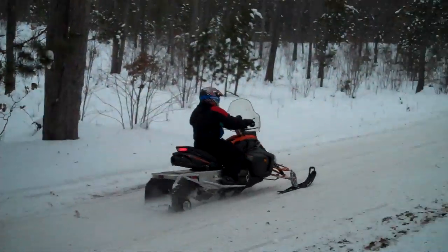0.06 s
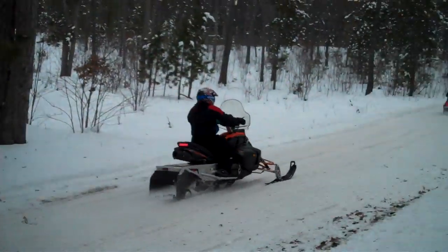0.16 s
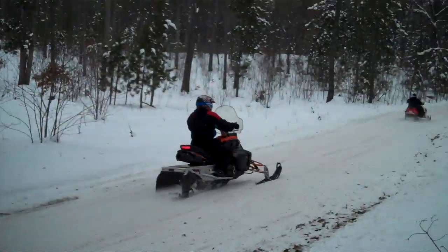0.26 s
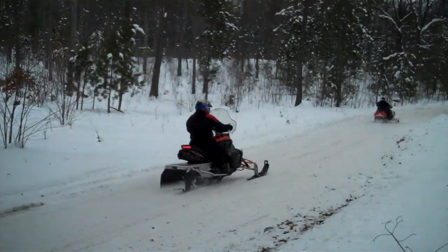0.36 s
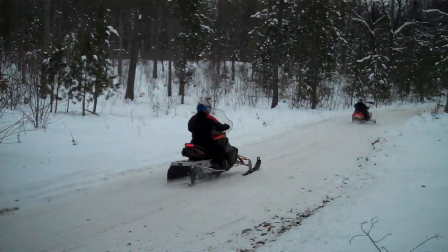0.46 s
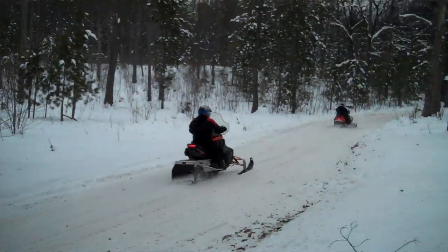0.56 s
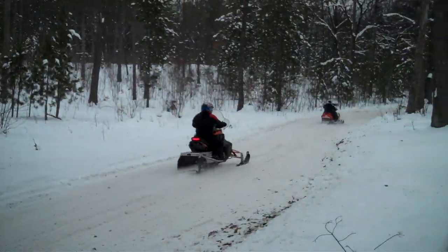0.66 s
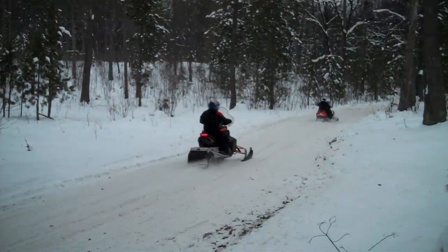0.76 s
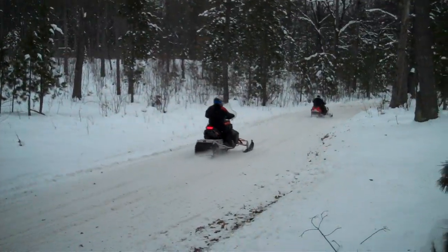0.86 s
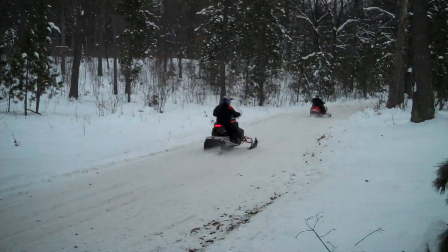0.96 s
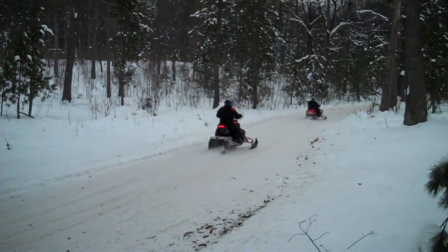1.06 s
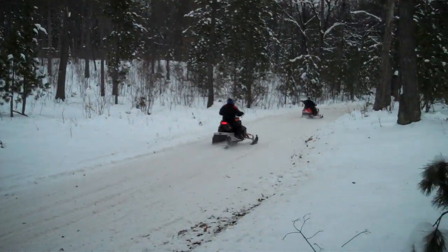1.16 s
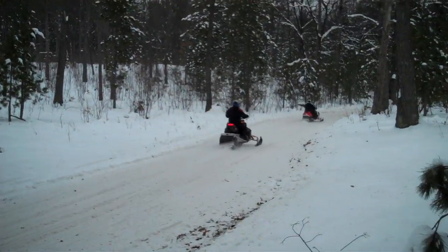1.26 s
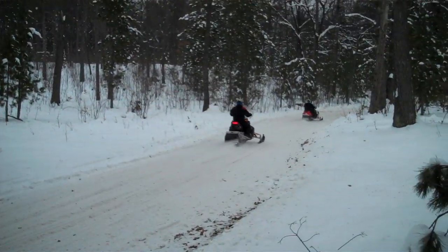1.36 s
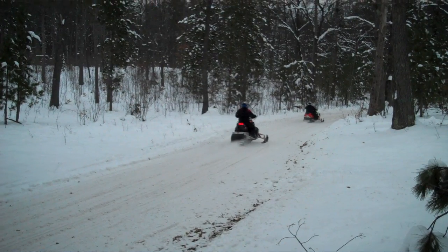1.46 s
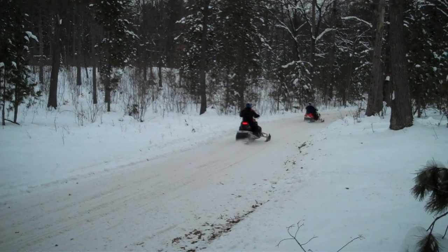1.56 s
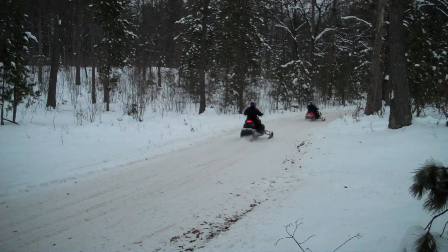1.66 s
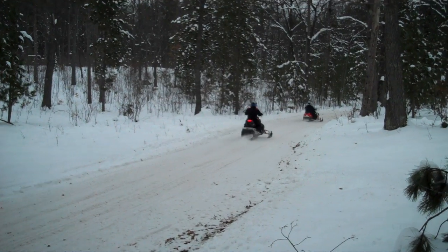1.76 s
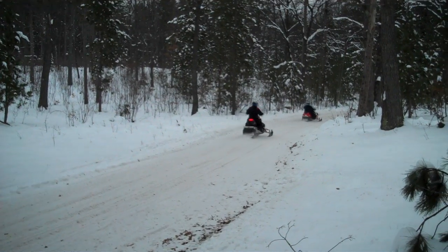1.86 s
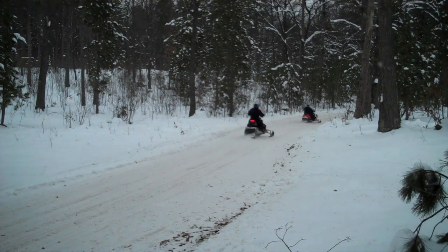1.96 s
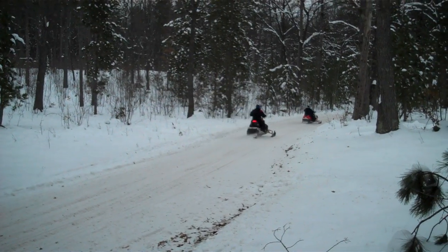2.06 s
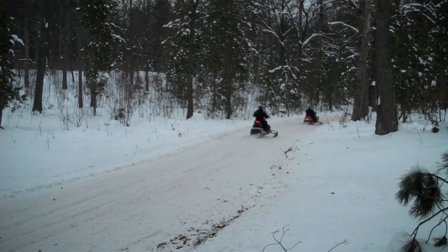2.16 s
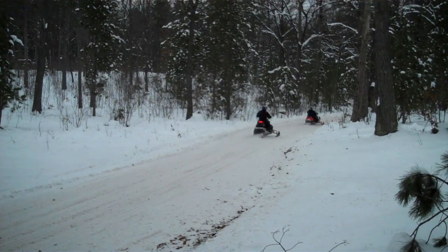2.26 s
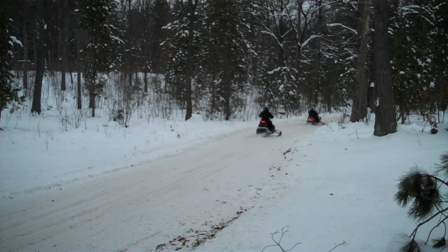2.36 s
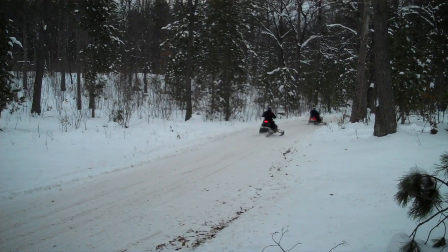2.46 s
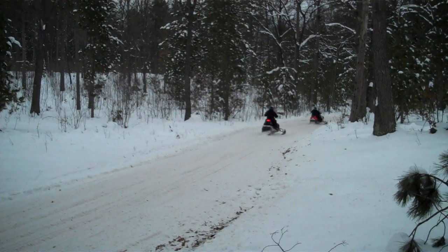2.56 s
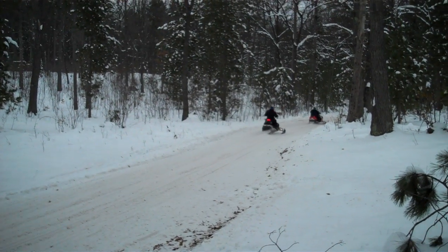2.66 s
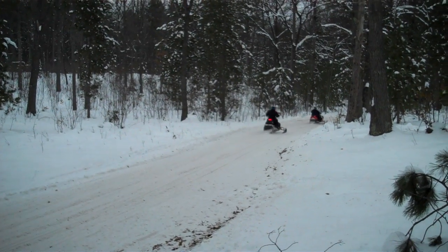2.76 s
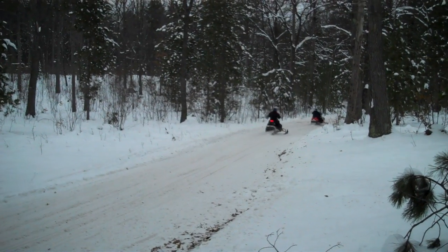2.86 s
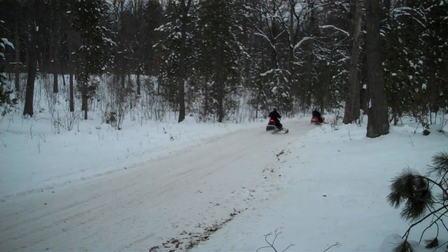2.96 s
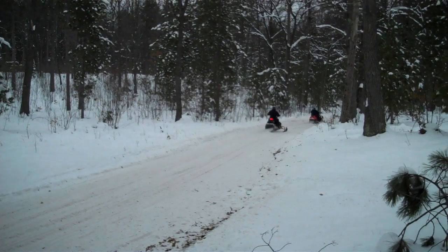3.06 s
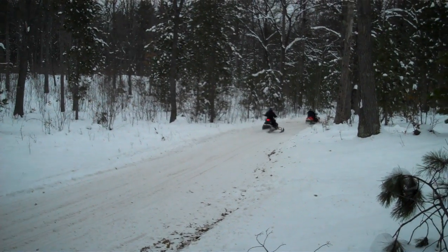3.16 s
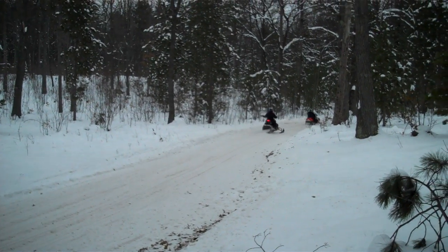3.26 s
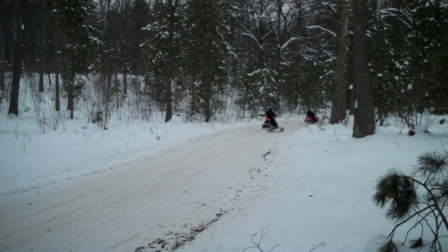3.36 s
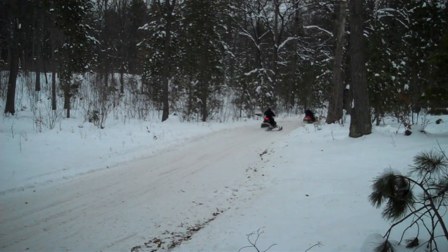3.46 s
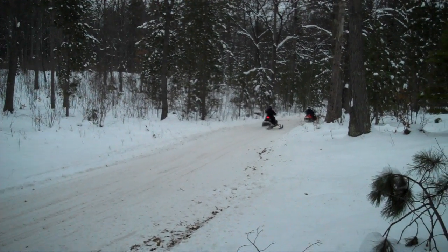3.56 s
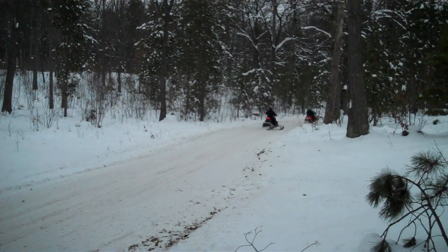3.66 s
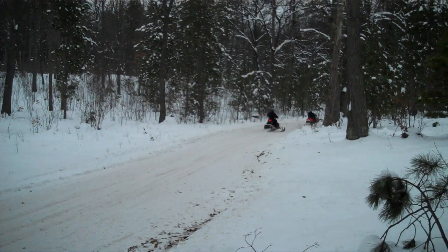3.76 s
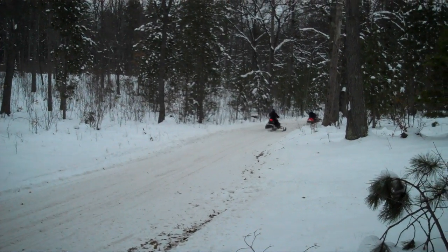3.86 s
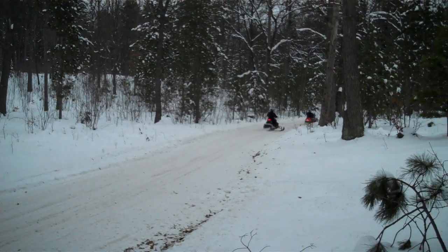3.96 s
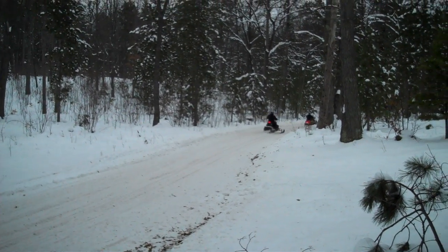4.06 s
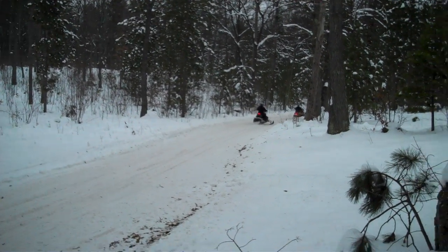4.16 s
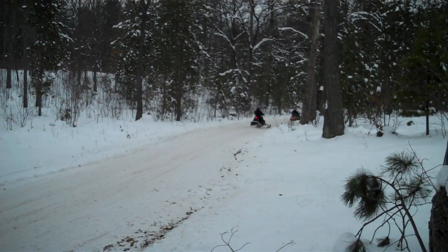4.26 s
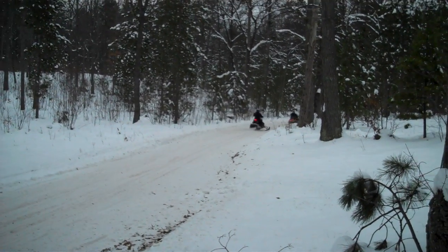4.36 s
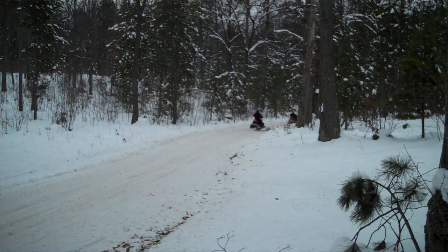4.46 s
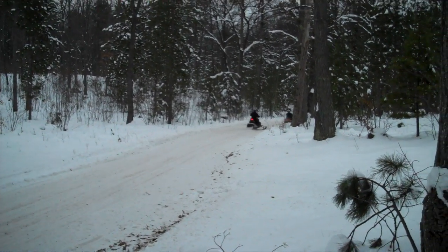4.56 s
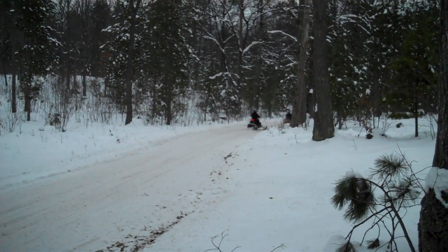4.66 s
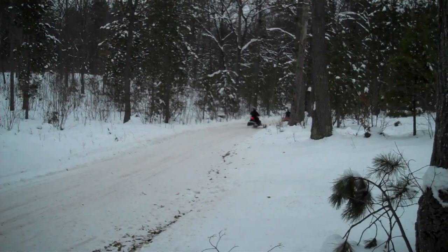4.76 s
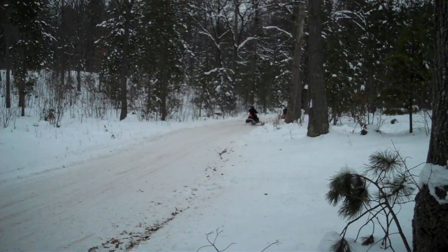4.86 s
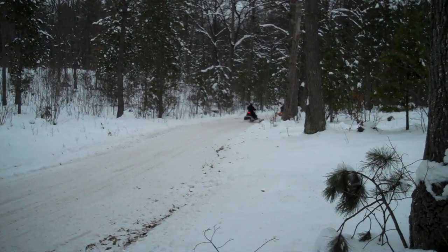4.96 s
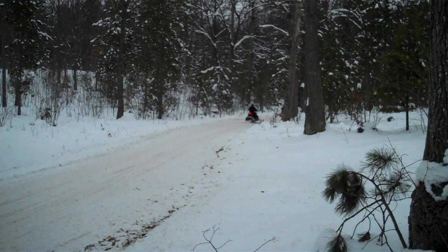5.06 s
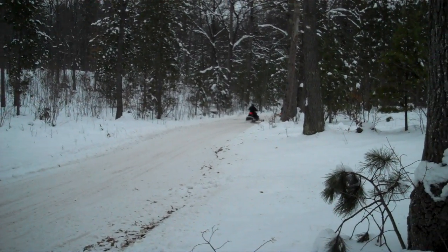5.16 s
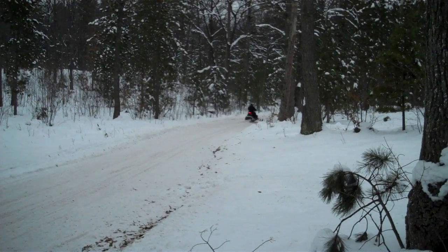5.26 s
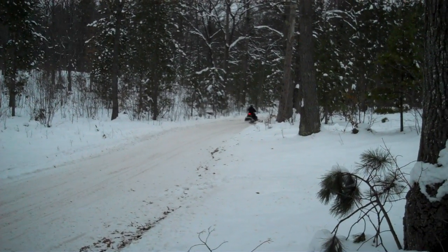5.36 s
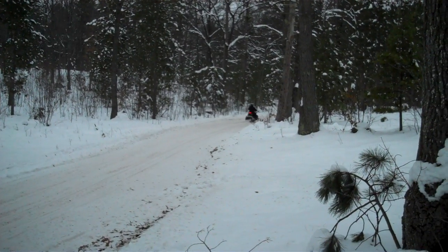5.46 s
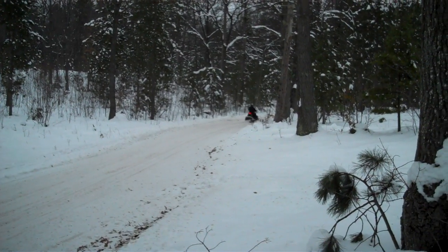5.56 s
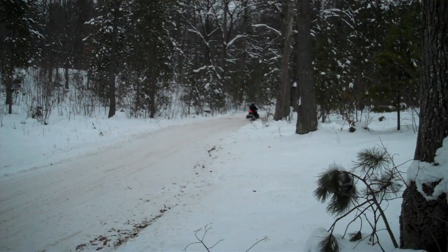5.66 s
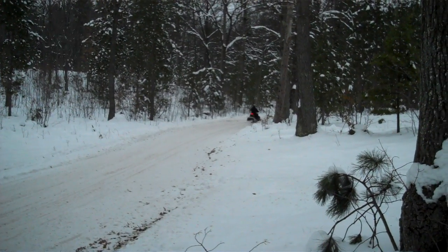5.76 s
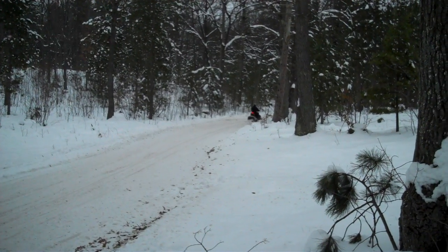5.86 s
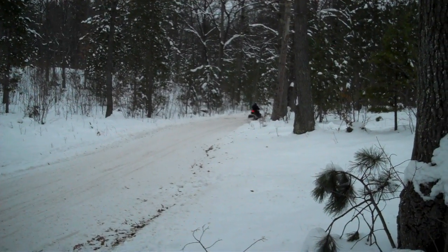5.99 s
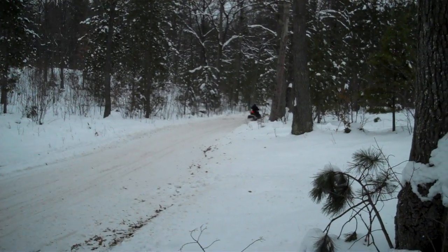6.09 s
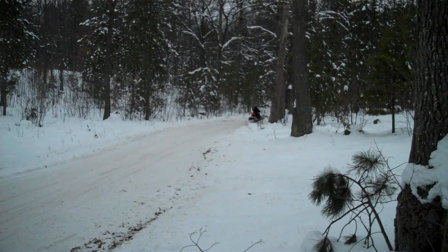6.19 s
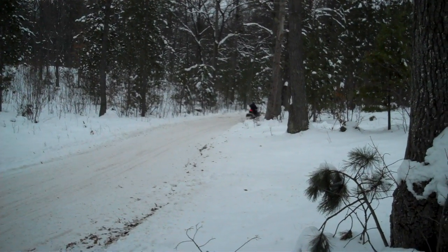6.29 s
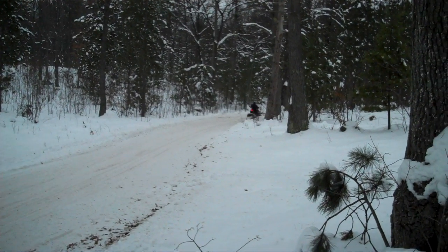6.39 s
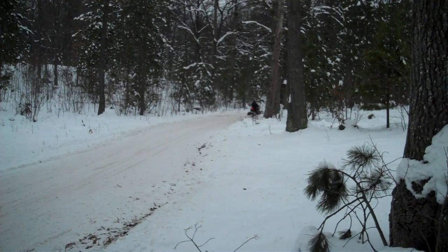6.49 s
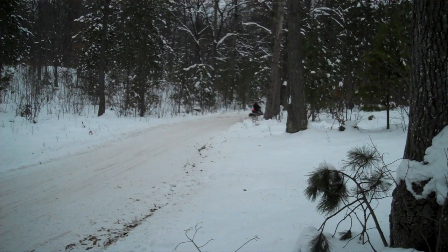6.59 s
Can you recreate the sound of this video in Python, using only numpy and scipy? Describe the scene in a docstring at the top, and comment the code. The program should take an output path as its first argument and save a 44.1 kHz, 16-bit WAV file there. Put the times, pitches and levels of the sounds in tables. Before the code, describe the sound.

A snowmobile drives away close by on packed snow, its engine dropping in pitch, popping and revving twice as it fades.

```python
"""A snowmobile engine passes close on a forest trail and recedes into the distance.
It pulls, coasts with uneven pops, picks up twice and coasts again. Each firing rings the exhaust
pipe, adds a sharp rasp and rattles the drive. The rubber track drums, whines and hisses over
packed snow, and the trunks scatter the rasp."""
import sys
import numpy as np
from scipy import signal
from scipy.fft import rfft, irfft, next_fast_len
from scipy.io import wavfile
from scipy.ndimage import uniform_filter1d, map_coordinates

SR = 44100
rng = np.random.default_rng(int(sys.argv[2]) if len(sys.argv) > 2 else 0)


def put_to_file(sound):
    """Save the sound as 16-bit audio at rate SR, in the file named by the first command-line argument."""
    columns = np.atleast_2d(sound).T  # one column per channel
    safe = np.clip(columns, -1, 1)
    whole_steps = np.round(safe * 32767)
    wavfile.write(sys.argv[1], SR, whole_steps.astype(np.int16))


N = 292366
TIME_S = np.arange(N) / SR


# engine speed (time [s], firing rate [Hz])
FIRING_HZ = [(0, 60.2), (.42, 58.6), (1.05, 59.5), (1.5, 58.5), (1.8, 57.3), (1.96, 55.4), (2.12, 50.3),
             (2.4, 44.6), (2.85, 39.2), (3.3, 35), (4.13, 30.8), (4.42, 34.4), (4.74, 32.2), (5.03, 38.9),
             (5.33, 39.5), (5.75, 42.5), (6.3, 31.2), (6.63, 33)]
def firings():
    """Engine cycles elapsed at each sample, and the firing times."""
    cycles = np.cumsum(curve(FIRING_HZ)) / SR + .8
    return cycles, np.interp(np.arange(1, int(cycles[-1]) + 1), cycles, TIME_S)


def revs_octaves():
    """Engine speed relative to its highest."""
    rate_hz = curve(FIRING_HZ)
    return np.log2(rate_hz / rate_hz.max())


# throttle openings (start [s], end [s], opening [0-1], kick of the first firings [dB])
THROTTLE = [(0, 1.97, 1, 1), (4.15, 4.72, 0.5, 4), (4.77, 5.81, 0.67, 3), (6.43, 7.4, 0.3, 5)]
def rider_throttle(ramp_s=0.021, settle_s=0.44, cut_db=9, cut_s=0.028):
    """Opening and firing gain: firings kick as the throttle opens and falter as it shuts."""
    throttle = spells([row[:3] for row in THROTTLE], ramp_s)
    blip_db = 0
    for start, end, _, kick_db in THROTTLE:
        blip_db += kick_db * (TIME_S > start) * np.exp(-np.abs(TIME_S - start) / settle_s)
        blip_db -= cut_db * swell(end, cut_s)
    return throttle, blip_db


# strong single firings, throttle shut (time [s], peak level [dB])
POPS = [(3.107, -27), (3.161, -28), (3.244, -28.5), (3.33, -30.5), (3.389, -29.5), (3.445, -32),
        (3.508, -36), (3.563, -31), (3.623, -28), (3.704, -31), (3.744, -31.5), (3.805, -32), (3.875, -37),
        (3.935, -44), (3.993, -47), (4.064, -54), (4.734, -32), (5.863, -36), (5.943, -34), (5.992, -35),
        (6.021, -36), (6.167, -36), (6.284, -34), (6.374, -38)]
def exhaust(fired_s, throttle, blip_db):
    """Each firing rings two pipe modes; the note sinks as the gas cools; slow coasting starves them."""
    idle_hz, hot_hz, pop_hz = 120.1, 23.3, 120
    climb_above_hz, climb_slope = 38.6, 5.38
    coast_db, starve_db, starve_below_hz, starve_span_hz = 3.5, 9, 38.3, 4.6
    uneven_db, coast_uneven_db = 0.48, 1.2
    rise_cycles, overtone_ratio, overtone_db = 0.82, 1.696, -21
    rate_hz, shut = curve(FIRING_HZ), 1 - throttle
    at = np.minimum((fired_s * SR).astype(int), N - 1)
    starved = np.clip((starve_below_hz - rate_hz) / starve_span_hz, 0, 1)
    note_hz = (idle_hz + climb_slope * np.maximum(rate_hz - climb_above_hz, 0) + hot_hz * throttle)[at]
    carry_db = carried(-10, side_loss_db=-0.61, loss_db_per_m=0.22)
    firing_db = (carry_db + blip_db + shut * (coast_db - starve_db * starved))[at]
    firing_db += (uneven_db + coast_uneven_db * shut[at]) * rng.standard_normal(len(at))
    # a pop replaces any firing that peaks within 13 ms of it
    peak_s = fired_s + rise_cycles / note_hz
    ordinary = np.abs(peak_s[:, None] - np.array(POPS)[:, 0]).min(axis=1) > .013
    puffs = list(zip(fired_s[ordinary], note_hz[ordinary], firing_db[ordinary]))
    puffs += [(s - rise_cycles / pop_hz, pop_hz, db) for s, db in POPS]
    out, t = np.zeros(N + SR), np.arange(SR // 12) / SR
    for start_s, hz, db in puffs:
        age = t * hz / rise_cycles
        phase = 2 * np.pi * hz * t
        modes = np.sin(phase) + amp(overtone_db) * np.sin(overtone_ratio * phase)
        out[round(start_s * SR):][:len(t)] += amp(db) * age * np.exp(1 - age) * modes
    return out[:N]


def thump(cycles, throttle, shut_loss_db=4, db_per_octave=13):
    """The deep tone at the firing rate grows with throttle and engine speed."""
    db = carried(-23.5, side_loss_db=1.5, loss_db_per_m=0.058)
    db += db_per_octave * revs_octaves() - shut_loss_db * (1 - throttle)
    return amp(db) * np.sqrt(2) * np.sin(2 * np.pi * cycles)


# upper exhaust spectrum (frequency [Hz], level [dB])
RASP_SPECTRUM = [(250, -51), (355, -16), (410, -1.5), (470, -1.5), (530, 4.5), (595, 4.5), (720, -9),
                 (890, -0.5), (1020, -20.5), (1240, -1), (1650, -3.5), (2500, -14), (3500, -24),
                 (6000, -43)]
def rasp(fired_s, throttle, shut_loss_db=13.5, scatter_db=2.2, spread_s=0.029, reflections=3):
    """Each firing's sharp front, with ground and trunk reflections that shift as the sled moves."""
    strengths = amp(-scatter_db * rng.standard_normal(len(fired_s)))
    fronts = np.bincount((fired_s * SR).astype(int), strengths, N)
    direct = unit(ring(fronts, RASP_SPECTRUM))
    t = np.arange(SR // 25) / SR
    out = direct
    for _ in range(reflections):
        path = np.exp(-t / spread_s) * rng.standard_normal(len(t))
        out = out + .45 * wobble(5) * unit(signal.fftconvolve(direct, path)[:N])
    carry_db = carried(-23, side_loss_db=15, loss_db_per_m=0.079)
    return amp(carry_db - shut_loss_db * (1 - throttle)) * unit(out)


# ground speed as lugs slapping the snow (time [s], lug rate [Hz])
LUG_HZ = [(0, 151.5), (.35, 148.7), (.85, 149.3), (1.3, 152), (1.75, 152.5), (2.12, 143.5), (3.2, 139.5),
          (4, 135), (5.4, 126), (5.9, 130), (6.63, 131)]
def lug_cycles():
    """Lug slaps elapsed at each sample."""
    return np.cumsum(curve(LUG_HZ)) / SR


# lug harmonics 1-3 (level from behind [dB], side loss [dB], path loss [dB/m])
LUG_HARMONICS = [(-20, 0.5, 0.96), (-38.5, 18, .22), (-36, 2, 0.29)]
# swells of one harmonic (time [s], half length [s], harmonic [1-3], gain [dB])
DRUM_SWELLS = [(0.325, 0.14, 3, 10.5), (1.72, 0.18, 2, 5), (2.245, 0.46, 2, 13.5), (5.61, 0.15, 2, 9.5),
               (5.88, 0.14, 3, 13), (6.202, 0.66, 2, 11.5), (6.548, 0.29, 3, 16)]
# spells of drive whine (time [s], half length [s], pitch [x lug rate], level [dB])
WHINES = [(.97, 0.44, 11.5, -37), (1.724, 0.3, 11.68, -36), (2.928, 0.45, 11.9, -42.5),
          (6.088, 0.71, 11.9, -56.5)]
def track(waver_db=1.0, fade_db=0.9, whine_waver_db=1.3):
    """The lugs drum at a rate set by ground speed, and the drive whines above them."""
    phase = 2 * np.pi * lug_cycles()
    slip_rad = .15 * wobble(14)
    drum = 0
    for k, carry in enumerate(LUG_HARMONICS, 1):
        swell_db = sum(db * swell(s, half_s) for s, half_s, harmonic, db in DRUM_SWELLS if harmonic == k)
        drift_db = waver_db * wobble(14) + fade_db * wobble(3.66)
        drum += amp(carried(*carry) + swell_db + drift_db) * np.sin(k * (phase + slip_rad))
    flutter_rad = .9 * wobble(55)
    whine = sum(amp(db) * swell(s, half_s) * np.sin(multiple * phase + flutter_rad)
                for s, half_s, multiple, db in WHINES)
    return np.sqrt(2) * (drum + amp(whine_waver_db * wobble(26.2)) * whine)


# rough stretches of trail (start [s], end [s], rattle gain [dB], snow gain [dB])
BUMPS = [(0.287, 0.326, -2, 1), (0.486, 0.51, 10.5, 2.5), (0.562, 0.92, 8.5, 0.4), (1.436, 1.494, 9, 0),
         (2.14, 2.18, 4, 2.5), (2.744, 2.87, 11, .6), (3.514, 3.557, 15, 0.7)]
def bumps(ramp_s=0.059):
    """Bumps shake the drive and throw snow: a gain in dB for each."""
    shake_db = spells([(start, end, db) for start, end, db, _ in BUMPS], ramp_s)
    throw_db = spells([(start, end, db) for start, end, _, db in BUMPS], ramp_s)
    return shake_db, throw_db


# drive tick spectrum (frequency [Hz], level [dB])
TICK_SPECTRUM = [(2500, -53), (5000, -21), (6500, 6.5), (7300, 9.5), (8500, -5), (11000, -15.5),
                 (14500, -22)]
def drive_rattle(fired_s, shake_db, decay_s=0.0037, scatter_db=1.5):
    """The drive ticks once a firing, harder over bumps."""
    at = (fired_s * SR).astype(int)
    db = carried(-20.5, side_loss_db=16.5, loss_db_per_m=0.28) + shake_db
    blows = np.bincount(at, amp(db[at] + scatter_db * rng.standard_normal(len(at))), N)
    bursts = signal.lfilter([1], [1, -np.exp(-1 / (decay_s * SR))], blows)
    return bursts * rush(TICK_SPECTRUM, patchy_db=4)


# running gear rumble spectra (frequency [Hz], density [dB])
RUMBLE_NEAR = [(20, -22), (60, -14), (110, 7.5), (190, 3), (280, 11.5), (380, -1.5), (600, 2.5), (850, 0.5),
               (1050, -7), (1500, -56)]
RUMBLE_FAR = [(15, -17), (40, 7.5), (70, 5), (130, 10), (220, -1.5), (320, 1.5), (400, -4.5), (600, -1),
              (850, 0), (1050, -8), (1500, -33)]
# track and ski clatter spectra (frequency [Hz], density [dB])
CLATTER_NEAR = [(560, -50), (950, -35), (1040, -30), (1090, 3.5), (1210, -3.5), (1590, 4.5), (1800, -1.5),
                (1940, 3.5), (3160, -3), (4200, -11), (5460, -44), (9240, -120)]
CLATTER_FAR = [(560, -32), (950, -16.5), (1040, -15), (1210, -3.5), (1450, -7.5), (1530, 0.5), (1700, -5.5),
               (1840, -4.5), (2120, -3), (2300, -9), (2590, -2.5), (3660, -19.5), (4200, -18), (5460, -28),
               (9240, -120)]
# thrown snow spectra (frequency [Hz], density [dB])
SPRAY_NEAR = [(1880, -6), (3200, -6), (4360, -3), (5690, 2.5), (6460, -5), (7230, 3.5), (8050, -12),
              (8860, -14.5), (11000, -27.5), (13700, -22), (14500, -47)]
SPRAY_FAR = [(1880, -42), (3200, -4.5), (3650, -6.5), (4090, -6.5), (5580, 4), (6540, -4), (7230, -2),
             (9200, -24.5), (11300, -28), (13600, -65), (14500, -47)]
def snow(cycles, throw_db, near_m=13.5, far_m=33, rumble_db_per_octave=4.5, throb=0.039, grain_db=0.13):
    """Track and skis rumble, clatter and throw snow; distance changes their colour."""
    far = np.clip((sled_position()[0] - near_m) / (far_m - near_m), 0, 1)
    receding = lambda near, distant: np.sqrt(1 - far) * near + np.sqrt(far) * distant
    rumble = receding(rush(RUMBLE_NEAR, patchy_db=2.4), rush(RUMBLE_FAR, patchy_db=2))
    rumble *= amp(carried(-22.5, side_loss_db=7.2, loss_db_per_m=0.052))
    rumble *= amp(rumble_db_per_octave * revs_octaves())
    clatter = receding(amp(-3) * rush(CLATTER_NEAR, 3.5), amp(0.34) * rush(CLATTER_FAR, 2))
    clatter *= amp(carried(-15.5, side_loss_db=16.6, loss_db_per_m=0.2))
    spray = receding(amp(-1.5) * rush(SPRAY_NEAR, 3.2), amp(-2.36) * rush(SPRAY_FAR, 2.5))
    spray *= amp(carried(-16.5, side_loss_db=13.7, loss_db_per_m=0.22))
    pulsing = 1 + throb * (1 - far) * np.cos(2 * np.pi * cycles)  # the gear shakes with the engine
    return rumble + pulsing * amp(throw_db + grain_db * wobble(110)) * (clatter + spray)


def sled_position(lug_pitch_m=.064, closest_m=5.29, start_past_m=0.67):
    """Distance (m), how squarely the tail faces the listener (0-1), and distance to the trail (m)."""
    past_m = start_past_m + lug_pitch_m * lug_cycles()
    distance_m = np.hypot(past_m, closest_m)
    return distance_m, past_m / distance_m, closest_m


def carried(behind_db, side_loss_db, loss_db_per_m):
    """Level (dB) of a part: it beams backwards, spreads out and is soaked up by snow and trees."""
    distance_m, tail_on, closest_m = sled_position()
    spreading_db = 20 * np.log10(distance_m / closest_m)
    absorbed_db = loss_db_per_m * (distance_m - closest_m)
    return behind_db - side_loss_db * (1 - tail_on) - spreading_db - absorbed_db


# forest reverberation (frequency [Hz], T60 [s])
FOREST_T60 = [(100, 0.14), (1000, 1), (8000, 0.033)]
def forest(x):
    """A thin tail scattered back by the trunks."""
    hz, t, noise = signal.stft(rng.standard_normal(SR // 2), SR, nperseg=256)
    decay = amp(-60 * t / along(FOREST_T60, hz)[:, None])
    tail = signal.istft(noise * decay, SR, nperseg=256)[1]
    return signal.fftconvolve(x, tail / np.linalg.norm(tail))[:N]


# left-right likeness of the noise (frequency [Hz], coherence [0-1])
COHERENCE = [(100, 0.96), (1300, .98), (3000, 0.87), (6600, 0.72), (10000, 0.15), (14000, 0.099)]
def rush(spectrum, patchy_db):
    """Stereo noise, mid rms 1, with patches of random gain in time and frequency."""
    def mid_side(hz):
        angle = np.arccos(np.clip(along(COHERENCE, hz), -1, 1)) / 2
        return amp(along(spectrum, hz)) * [np.cos(angle), np.sin(angle)]
    noise = signal.stft(rng.standard_normal((2, N)), nperseg=1024)[2]
    patches = uniform_filter1d(rng.standard_normal(noise.shape[1:]), size=3, axis=0)
    patches = uniform_filter1d(patches, size=18, axis=1)
    pair = signal.istft(noise * amp(patchy_db * unit(patches)), nperseg=1024)[1][:, :N]
    mid, side = filtered(pair, mid_side)
    return np.array([mid + side, mid - side]) / mid.std()


def ring(x, spectrum, size=4096):
    """x through a minimum-phase body with the given spectrum."""
    cepstrum = irfft(np.log(amp(along(spectrum, np.fft.rfftfreq(size, 1 / SR)))))
    cepstrum[1:size // 2] *= 2
    cepstrum[size // 2 + 1:] = 0
    return signal.fftconvolve(x, irfft(np.exp(rfft(cepstrum))))[:N]


def filtered(x, response):
    """x through the gain response(hz)."""
    size = next_fast_len(N + SR // 2)
    return irfft(rfft(x, size) * response(np.fft.rfftfreq(size, 1 / SR)), size)[..., :N]


def wobble(knots_per_s):
    """A smooth random curve."""
    positions = np.linspace(0, N * knots_per_s / SR, N // 64)
    smooth = map_coordinates(rng.standard_normal(1024), [positions], mode="wrap")
    return np.interp(np.linspace(0, 1, N), np.linspace(0, 1, len(smooth)), smooth)


def spells(rows, ramp_s):
    """Each (start, end, value) row holds its value, with ramps just outside both ends."""
    return sum(value * np.clip(1 + np.minimum(TIME_S - start, end - TIME_S) / ramp_s, 0, 1)
               for start, end, value in rows)


def swell(centre_s, half_s):
    """A bell-shaped rise and fall."""
    return np.exp(-((TIME_S - centre_s) / half_s) ** 2)


def curve(points):
    """(time, value) points at every sample."""
    return np.interp(TIME_S, *np.transpose(points))


def along(points, hz):
    """(frequency, value) points on a log axis."""
    knots_hz, values = np.transpose(points)
    return np.interp(np.log(hz + 1), np.log(knots_hz + 1), values)


def amp(db):
    return 10 ** (np.asarray(db) / 20)


def unit(x):
    return x / np.sqrt(np.mean(x ** 2) + 1e-20)


def scene():
    """Engine, track and snow; the trunks echo the rasp, while long waves pass around them."""
    cycles, fired_s = firings()
    throttle, blip_db = rider_throttle()
    shake_db, throw_db = bumps()
    bark = rasp(fired_s, throttle)
    echo = amp(-12) * forest(bark)
    engine = exhaust(fired_s, throttle, blip_db) + thump(cycles, throttle) + bark + echo
    return engine + track() + drive_rattle(fired_s, shake_db) + snow(cycles, throw_db)


# microphone pair balance (frequency [Hz], left minus right [dB])
MIC_BALANCE = [(60, 1.8), (200, 0), (2300, -0.4), (4300, -1), (5800, -3), (7500, 17), (10000, 5),
               (13000, 17)]
def record(dry, top_hz=14500):
    """The right microphone is duller than the left; nothing passes above the band limit."""
    def microphones(hz):
        ratio = amp(along(MIC_BALANCE, hz))
        right = 2 / (1 + ratio) * (hz < top_hz)
        return np.array([ratio * right, right])
    return filtered(dry, microphones)


dry = scene()
out = record(dry)
put_to_file(out)
```